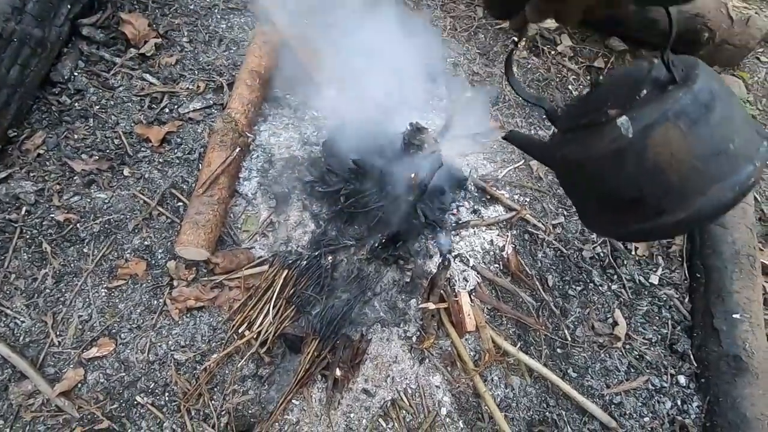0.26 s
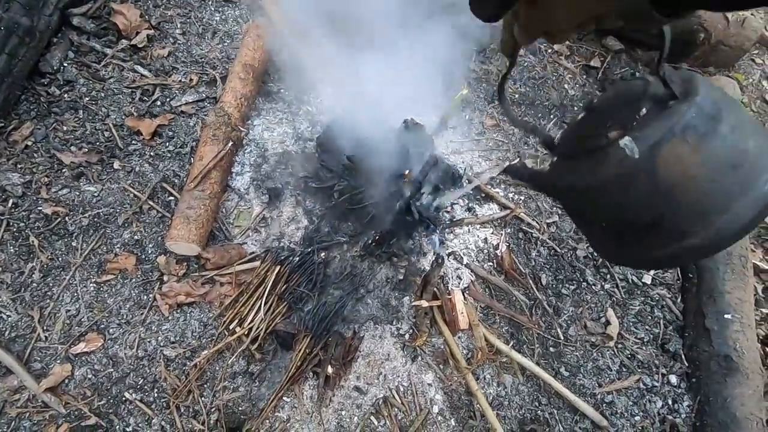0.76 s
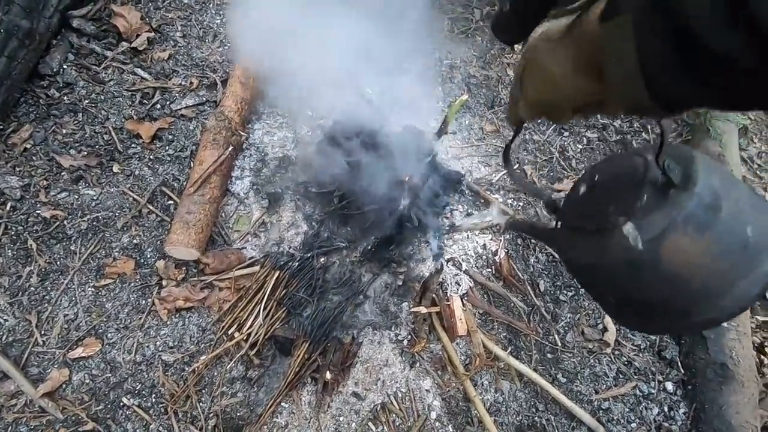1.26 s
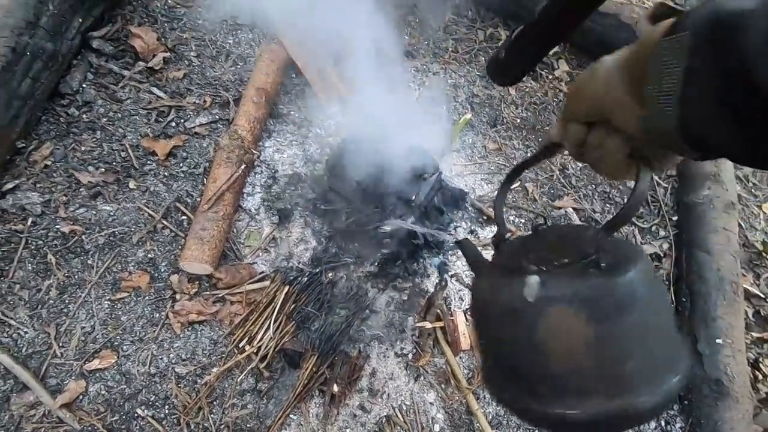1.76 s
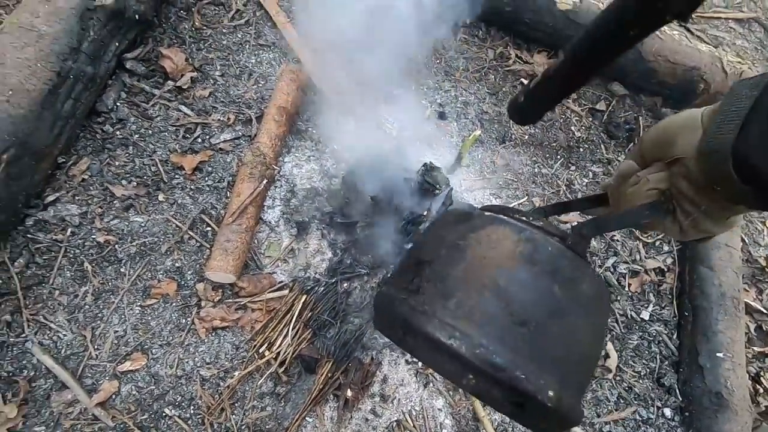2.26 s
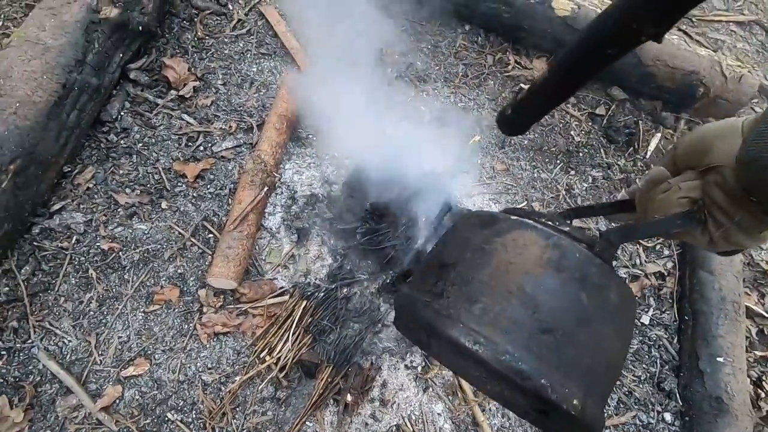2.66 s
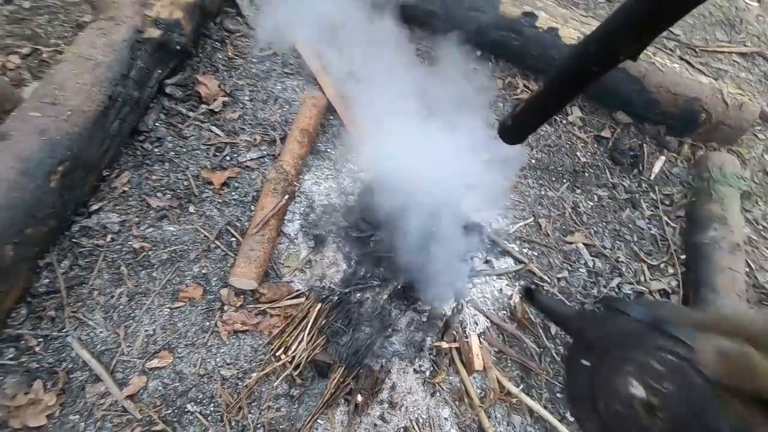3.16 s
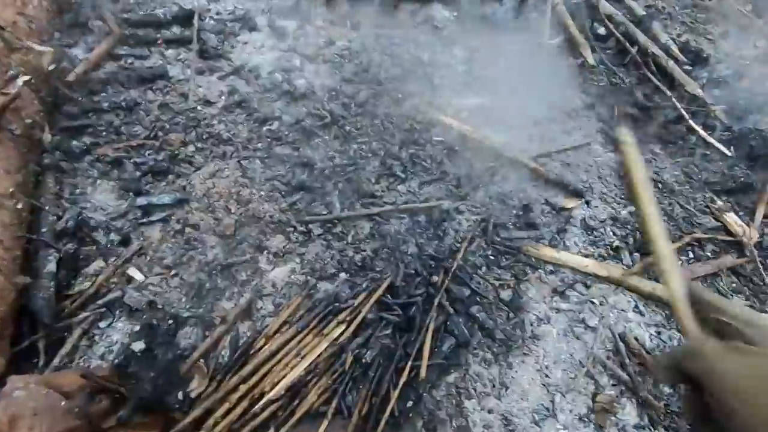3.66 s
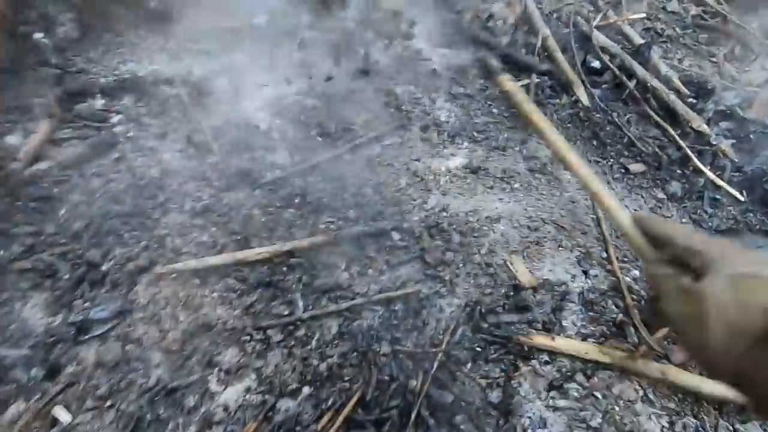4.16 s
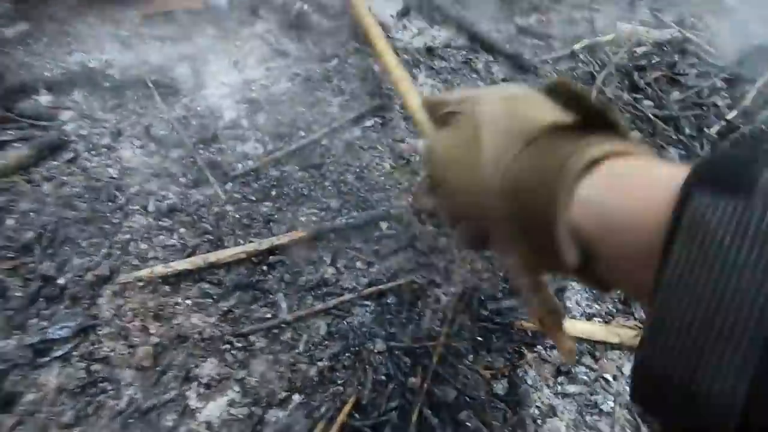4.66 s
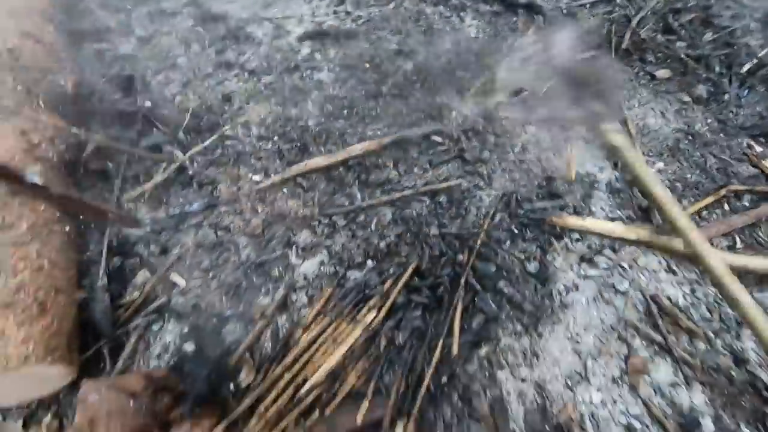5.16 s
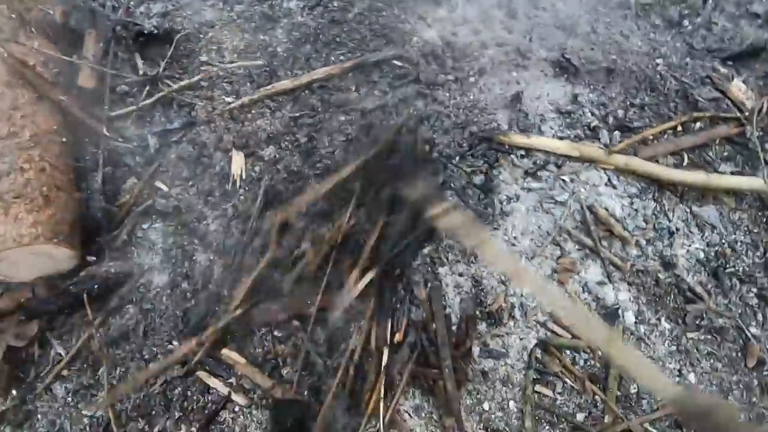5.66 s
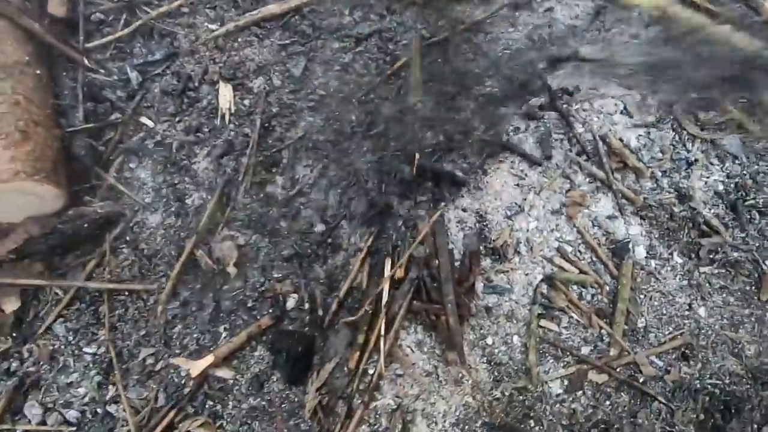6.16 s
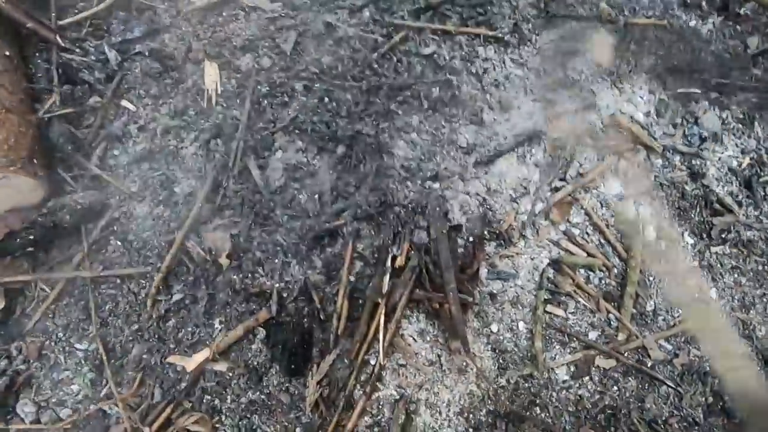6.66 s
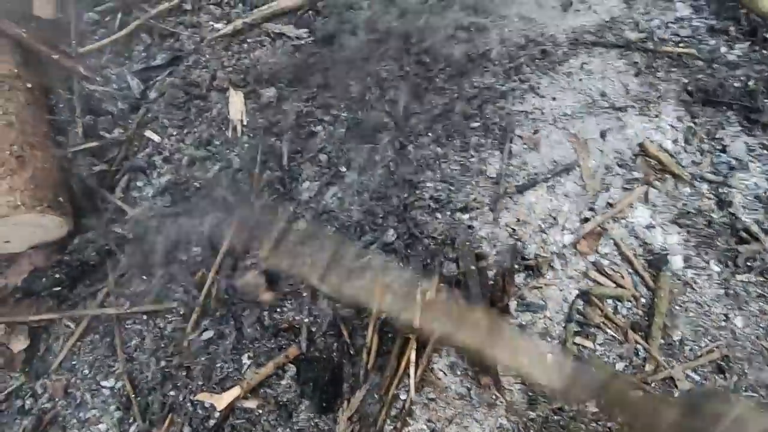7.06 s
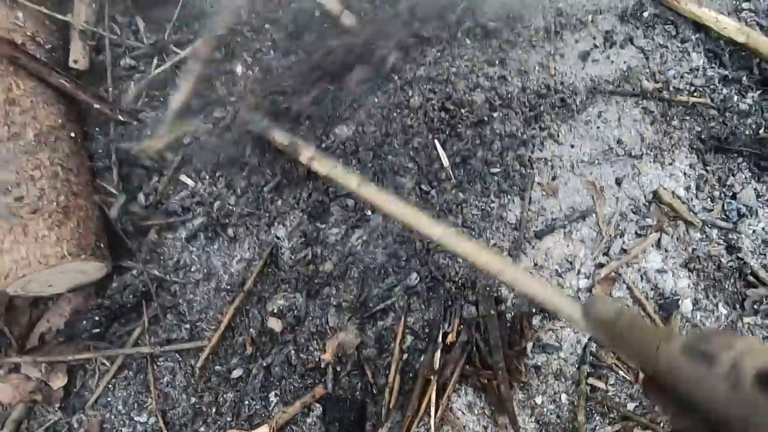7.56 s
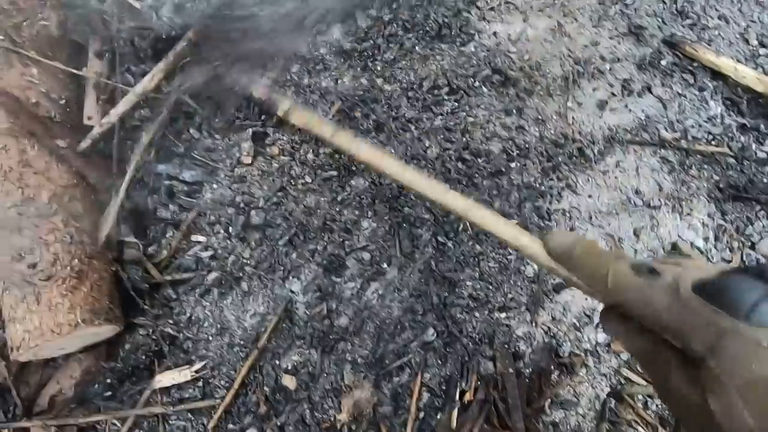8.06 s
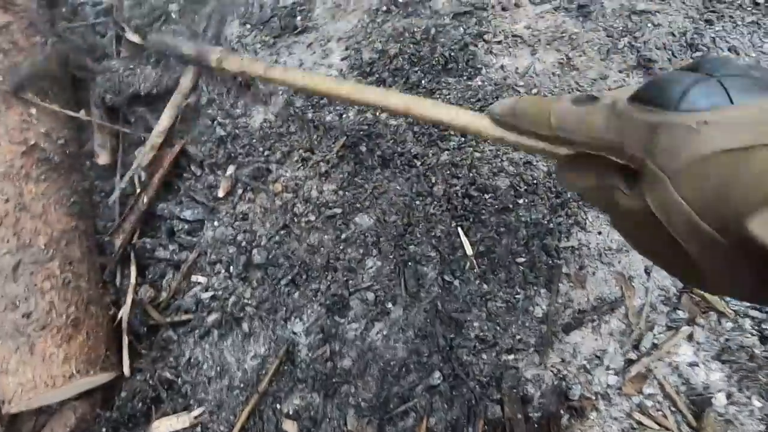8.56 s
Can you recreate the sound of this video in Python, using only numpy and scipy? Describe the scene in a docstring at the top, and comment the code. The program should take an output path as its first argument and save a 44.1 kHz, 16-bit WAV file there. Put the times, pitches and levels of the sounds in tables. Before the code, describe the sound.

Quiet steam hiss with small pops and soft kettle clinks over embers, then a stick rakes crunchy wet ash with sharp, loud cracks.

```python
"""Water from a kettle lands on hot embers: filtered noise hisses as steam and short bursts pop.
Meanwhile rising sine bubbles gurgle in the kettle and decaying metal modes clank.
Then a stick rakes the wet ash: clouds of short grains crunch, damped sines thump, and cracks ring the stick.
All of it is straight ahead of a body-worn microphone, which every movement rocks with
slow noise below hearing, over the lumpy rumble of a light wind and cloth."""
import sys
import numpy as np
from scipy import signal
from scipy.fft import rfft, irfft
from scipy.io import wavfile
from scipy.ndimage import uniform_filter1d

SR = 44100
rng = np.random.default_rng(int(sys.argv[2]) if len(sys.argv) > 2 else 0)


def store_pcm(level_fs):
    """Save levels as 16-bit WAV."""
    pcm = np.round(np.clip(level_fs, -1, 1) * 32767).astype(np.int16)
    wavfile.write(sys.argv[1], SR, np.atleast_2d(pcm).T)


N = 388080

# strokes of the stick through the ash: start_s (full pressure reached), held_s, level_db,
# depth_db (extra crunch and digging from deeper in the ash)
STICK_STROKES = [(3.53, 0.011, -48, -1), (3.7, .06, -50, -8), (3.79, 0.26, -43.5, 2.5),
                 (4.12, 0.014, -34, 0.5), (4.17, 0.22, -42, 4), (4.54, 0.084, -40.5, 3),
                 (4.67, 0.042, -30, 2), (4.78, 0.073, -40, -1), (4.88, 0.15, -38, -0.5),
                 (5.13, 0.026, -35, 6), (5.19, 0.079, -44, 4.5), (5.395, 0.069, -34.5, 2.5),
                 (5.5, 0.088, -31.5, -4), (5.545, 0.026, -26, -7), (5.62, 0.13, -36.5, -0.5),
                 (5.77, 0.028, -41.5, 7), (5.94, 0.038, -39.5, 3), (6.12, .11, -35.5, -1),
                 (6.3, 0.072, -41.5, 4.5), (6.37, 0.067, -37, 0.5), (6.525, 0.024, -34, -0.5),
                 (6.58, 0.21, -41, -1.5), (6.87, 0.046, -38, 2), (6.98, 0.078, -38.5, 2),
                 (7.12, 0.041, -38.5, -0.5), (7.21, 0.011, -39, 11.5), (7.275, 0.0096, -31, 2.5),
                 (7.38, 0.02, -33, 0.5), (7.53, 0.029, -37.5, 3), (7.635, 0.079, -40.5, 0),
                 (7.78, .15, -41, -2), (8.04, .14, -38.5, 2), (8.2, 0.18, -43, 0), (8.35, 0.02, -37, 4),
                 (8.425, 0.018, -34, 0), (8.52, 0.11, -40, 1.5), (8.66, 0.059, -39, 4),
                 (8.77, 0.0093, -35.5, 0)]
FIRST_STROKE_S, SECOND_STROKE_S = STICK_STROKES[0][0], STICK_STROKES[1][0]


def raking():
    """Grit slips in clumps under the stick; lumps of ash crunch below it."""
    # colour of the sliding grit: pitch_hz, gain_db
    grit_colour = [(100, -2.5), (250, 5.5), (500, 1.5), (1200, 0.5), (3200, 5), (5400, 2.5), (8600, 4),
                   (10600, -6.5), (13600, -2), (16000, -12)]
    charcoal_db, charcoal_per_s = -7.5, 220  # hard bits that ring briefly, level against the grit
    crunch_db, digging_db = -14.5, -28.5  # at 0 dB stroke level and 0 dB depth
    follow = 0.8  # dB of crunch and digging per dB of stroke: hard strokes are brighter

    level_db, depth_db = pressure()
    clumps = gain_of(2.7 * drift(0.0055))
    slide = rng.standard_normal(N) * 0.69
    slide += grains(3500 * clumps, 3.55, 510, 13600, cycles=1.04)
    grit = patchy(coloured(slide * clumps, grit_colour), 2, 1800, .025)
    low = band(grit, 36, 1920)
    bright = evened(grit - low)
    tumble = evened(low * gain_of(2.5 * drift(.01)))  # lumps of ash roll on their own
    # the tip digs into lumps
    digging = evened(band(grains(70, 3.5, 70, 420, cycles=1.1), 50, 500))
    bits = grains(charcoal_per_s * clumps, 3.5, 1200, 6000, cycles=5.5)

    surface = gain_of(level_db) * (bright + gain_of(charcoal_db) * bits)
    deep_db = follow * level_db + depth_db
    return surface + gain_of(crunch_db + deep_db) * tumble + gain_of(digging_db + deep_db) * digging


def pressure():
    """Level of the stick in the ash (all strokes over the trickle between them) and its depth, both in dB."""
    press_db_per_s, lift_db_per_s = 597, 446  # each stroke rises, holds and falls
    settling_db = -51.5  # ash trickles in between
    t = np.arange(N) / SR
    power = gain_of(settling_db) ** 2 * (t > SECOND_STROKE_S) + 1e-9
    depth = 0
    for s, held, db, depth_db in STICK_STROKES:
        off_db = np.maximum(press_db_per_s * (s - t), lift_db_per_s * (t - s - held))
        stroke = gain_of(db - np.clip(off_db, 0, 100)) ** 2
        power = power + stroke
        depth = depth + stroke * depth_db
    return 10 * np.log10(power), depth / power


def cracks():
    """Each crack also rings the stick at a new spot, and a few crumbs scatter after it."""
    # single coals and twigs cracking against the stick: start_s, peak_db, pitch_hz (centre)
    single_cracks = [(3.6, -26.5, 2410), (3.659, -30, 3820), (3.796, -24.5, 2410), (3.915, -21.5, 8050),
                     (4.013, -22, 3750), (4.188, -6.5, 4150), (4.216, -16, 787), (4.376, -18, 4970),
                     (4.483, -20.5, 4800), (4.505, -22.5, 3990), (4.594, -30, 3950), (4.684, -29, 2720),
                     (4.71, -13, 1590), (4.799, -14, 5500), (4.84, -24, 2620), (5.072, -30, 1940),
                     (5.397, -15.5, 2430), (5.421, -18.5, 2400), (5.558, -12.5, 8400), (5.664, -15, 4430),
                     (5.765, -14.5, 1460), (5.946, -14, 5800), (5.984, -14, 2340), (6.166, -21.5, 3000),
                     (6.18, -24, 8200), (6.223, -22.5, 690), (6.302, -20.5, 6160), (6.337, -14.5, 3680),
                     (6.454, -17.5, 6140), (6.509, -16.5, 4150), (6.525, -6, 3770), (6.629, -25.5, 5220),
                     (6.671, -29.5, 1700), (6.695, -15, 2380), (6.931, -21, 3680), (7.007, -22, 4450),
                     (7.087, -15.5, 866), (7.206, -13, 1740), (7.2568, -23, 2380), (7.278, -12.5, 3700),
                     (7.327, -18.5, 1920), (7.413, -11, 6900), (7.479, -25, 3600), (7.537, -19.5, 8400),
                     (7.5647, -22, 1800), (7.778, -22.5, 8200), (7.8244, -25, 2530), (7.96, -9.5, 2480),
                     (8.039, -21, 5400), (8.099, -12, 4970), (8.135, -25, 1900), (8.214, -20.5, 4320),
                     (8.302, -16, 7000), (8.318, -14, 8700), (8.351, -19.5, 2330), (8.416, -20, 3900),
                     (8.433, -15.5, 4850), (8.452, -16.5, 1690), (8.517, -17.5, 2870), (8.546, -12.5, 4900),
                     (8.564, -15, 4900), (8.587, -16.5, 3180), (8.602, -17, 1980), (8.676, -14, 1780),
                     (8.704, -10, 1760), (8.761, -24, 1750), (8.784, -16, 4750)]
    # modes of the stick: pitch_hz, level_db, t60_s
    stick_modes = [(720, 31, 0.0019), (1824, 12.5, 0.027), (2375, 15, 0.022), (3100, 18, 0.0055),
                   (4124, 13, 0.022), (4970, 17.5, 0.0041), (5760, 17.5, 0.0033)]
    grip_shift = .05  # typical share by which grip and pressure retune the stick from blow to blow

    out, t = np.zeros(N), np.arange(3000) / SR
    every = single_cracks + small_cracks()
    for (s, db, hz), noise in zip(every, rng.standard_normal((len(every), 3, len(t)))):
        t60 = .005 + 8 / hz  # larger pieces sound lower and longer
        spot_db = near(stick_modes, hz, 4) + 4.0 * noise[2, :len(stick_modes)]
        stick = ring(stick_modes, t * (1 + grip_shift * noise[2, -1]), spot_db)
        blow = peak_at(0, snap(hz, t60, noise[0])) + 0.058 * stick
        blow = band(blow, hz * .5, 10000)  # small pieces radiate no bass
        scatter_db = 8.5 * uniform_filter1d(noise[2], 40) * np.sqrt(40)
        crumbs = band(noise[1] * gain_of(-60 * t / 0.22 + scatter_db), hz * .5, 7500)
        push = np.sin(2 * np.pi * 420 * t) * gain_of(-60 * t / 0.008)  # the ash bed gives under low blows
        push_db = db - 11 - 9 * np.log2(hz / 1000)
        add(out, s, peak_at(db, blow) + peak_at(db - 30, crumbs) + peak_at(push_db, push))
    return out


def small_cracks():
    """Lesser cracks at random moments of the raking, as loud as the stroke allows."""
    count, pitch_hz = 50, (1000, 8500)
    over_stroke_db, top_db = (10, 14), -28  # range of peaks over the stroke level, and their ceiling
    s, size, pitch = rng.random((count, 3)).T
    s = np.interp(s, [0, 1], [SECOND_STROKE_S, N / SR])
    stroke_db = np.interp(s * SR, np.arange(N), pressure()[0])
    db = stroke_db + np.interp(size, [0, 1], over_stroke_db)
    return list(zip(s, np.minimum(db, top_db), spread(pitch, *pitch_hz)))


def snap(hz, t60, noise):
    """A sharp crack: a few cycles at the pitch of the breaking piece and its overtone, in a brighter noise burst."""
    t = np.arange(len(noise)) / SR
    decay = gain_of(-60 * t / t60) * (1 - np.exp(-t * hz * 2.5))
    burst = peak_at(0, band(noise * decay, hz * 0.12, 21800))
    tone = np.sin(2 * np.pi * hz * t) + 0.39 * np.sin(2 * np.pi * 1.72 * hz * t)
    return decay * tone + 1.16 * burst


def thumps():
    """The tip of the stick pushes softly into the ground: a low sine that dies within a few cycles."""
    # thumps of the tip: start_s, peak_db, pitch_hz
    tip_thumps = [(4.706, -42, 350), (5.126, -36, 199), (5.15, -53, 160), (7.046, -39, 260),
                  (7.284, -43, 190), (7.398, -38, 177), (7.786, -42, 290), (7.836, -33.5, 247),
                  (8.703, -23, 555)]
    cycles = 7.5  # until a thump has fallen by 60 dB
    out, t = np.zeros(N), np.arange(4000) / SR
    for s, db, hz in tip_thumps:
        envelope = gain_of(-60 * t * hz / cycles) * (1 - np.exp(-3 * hz * t))
        add(out, s, peak_at(db, np.sin(2 * np.pi * hz * t) * envelope))
    return out


def kettle():
    """Bubbles rise in pitch as they die; knocks ring the thin metal, and the harder ones also thud."""
    # bubbles in the pouring water: start_s, peak_db, pitch_hz (at the start)
    gurgles = [(0.421, -49, 940), (0.542, -47, 670), (0.563, -47, 920), (0.863, -46, 850),
               (0.988, -42, 740), (1.019, -44, 560), (1.097, -44, 590), (1.214, -43.5, 626),
               (1.26, -53, 620), (1.568, -44.5, 604)]
    # lid and handle knocking the kettle: start_s, peak_db, pitch_hz (of the modes struck most)
    clanks = [(0.42, -40.5, 3110), (0.545, -43, 1750), (0.623, -33.5, 3100), (0.645, -23, 1905),
              (0.719, -43, 2450), (0.778, -36, 1750), (0.862, -38, 3110), (0.872, -40, 1750),
              (0.9256, -43, 4000), (0.9896, -26.5, 3160), (1.0162, -36, 1740), (1.0984, -34.5, 1700),
              (1.21, -38, 1760), (2.966, -24, 2950), (2.9762, -26.5, 1500), (2.98, -35, 660)]
    # modes of the metal: pitch_hz, level_db, t60_s
    metal_modes = [(690, 25, 0.038), (964, 2, .11), (1490, -6, 0.066), (1750, -8.5, 0.094),
                   (2510, -4, 0.14), (2990, 14.5, 0.011), (3190, -0.5, 0.17), (3330, 3, 0.05),
                   (3900, 1, 0.2), (4970, -1, 0.082), (5460, 16, 0.056)]
    emptying_db_per_s = 7.5  # the emptier the kettle, the more it thuds

    out, t = np.zeros(N), np.arange(9000) / SR
    for s, db, hz in gurgles:
        turns = hz * (t + 3.7 * t ** 2)
        envelope = gain_of(-60 * t / 0.048) * (1 - np.exp(-t / 0.0009))
        add(out, s, peak_at(db, np.sin(2 * np.pi * turns) * envelope))
    for (s, db, hz), noise in zip(clanks, rng.standard_normal((len(clanks), len(t)))):
        rattle = band(noise * gain_of(-60 * t / .06), 400, 4000)
        tone = ring(metal_modes, t, near(metal_modes, hz, 28))
        metal = peak_at(0, tone) + peak_at(.4 * db + 7, rattle)  # light touches ring purer
        thud = np.sin(2 * np.pi * 280 * t) * gain_of(-60 * t / 0.013) * (1 - np.exp(-t / 0.0028))
        thud_db = 2.71 * db + 11 + emptying_db_per_s * s
        add(out, s, peak_at(db, metal) + peak_at(thud_db, thud))
    return out


def embers():
    """Pockets of steam burst out of the coals."""
    # single pops of steam, loud and faint: start_s, peak_db, pitch_hz (centre)
    single_pops = [(0.123, -33.5, 8250), (0.771, -26, 3180), (0.978, -29.5, 3120), (1.045, -28, 8100),
                   (1.231, -31, 8000), (1.2926, -28, 2200), (1.462, -29, 7850), (1.747, -25, 8040),
                   (1.9539, -24, 7650), (2.088, -30, 4900), (2.179, -29.5, 7300), (2.356, -29.5, 8610),
                   (2.557, -35, 13000), (2.6526, -32, 7800), (2.929, -32.5, 4880), (3.2634, -33.5, 8420),
                   (3.3928, -38, 12000), (3.4127, -43, 5130)]
    out, pops = np.zeros(N), single_pops + small_pops()
    for (s, db, hz), noise in zip(pops, rng.standard_normal((len(pops), 800))):
        add(out, s, peak_at(db, snap(hz, .005, noise)))
    return out


def small_pops():
    """Faint pops at random moments before the raking."""
    count, peak_db, pitch_hz = 22, (-45, -38), (2300, 13000)
    s, size, pitch = rng.random((count, 3)).T
    return list(zip(s * FIRST_STROKE_S, np.interp(size, [0, 1], peak_db), spread(pitch, *pitch_hz)))


def steam():
    """Fine fizz and tiny spits over a hiss that flutters in patches."""
    # steam from the embers: start_s, level_db
    steam_level = [(0, -53.5), (.4, -52), (1.07, -49), (1.7, -52.5), (2.5, -57), (3.5, -56.5), (8.8, -64)]
    # colour of the hiss: pitch_hz, gain_db
    hiss_colour = [(71, 12.5), (120, -19.5), (289, -2), (569, -1.5), (1010, -2.5), (1580, -4.5),
                   (3200, -3.5), (4660, -7), (5670, -4), (6630, -10), (8100, -1.5), (8900, -5.5),
                   (10400, -18.5), (12300, -9.5), (13800, -11.5), (16000, -20)]
    fizz = rng.standard_normal(N) * gain_of(.8 * drift(.02))
    spits = .5 * grains(400, 4.5, 3000, 14000, cycles=.8)
    hiss = patchy(coloured(fizz + spits, hiss_colour), 1.64, 1200, 0.032)
    return gain_of(curves(steam_level)[0]) * hiss


def sway():
    """Slow pressure swings at the microphone, and the lumpy rumble of wind and cloth."""
    # body movement and wind: start_s, swing_db (before the evening out below), rumble_db
    movement = [(0.0, -46.5, -66.5), (0.38, -32, -65.5), (1.66, -31, -62), (1.84, -49.5, -69),
                (2.42, -35, -66), (3.34, -38, -60), (4.15, -24.5, -56), (4.54, -37.5, -64), (5.1, -22, -53),
                (5.98, -28, -55), (6.25, -31.5, -62), (7.5, -27, -49), (8.2, -30.5, -59), (8.8, -31, -66)]
    # colour of the rocking: pitch_hz, gain_db
    rocking_colour = [(2, -9), (5, 3), (9, 1.5), (14, -7), (19, -29), (25, -14.5), (31, -51), (40, -26),
                      (60, -67.5)]
    swing_db, rumble_db = curves(movement)
    gain = gain_of(read(rocking_colour, np.fft.rfftfreq(N, 1 / SR)))
    swing = evened(irfft(rfft(rng.standard_normal(N)) * gain, N))
    # evened out, so that the movement sets the size of the swings
    lumps = np.sqrt(uniform_filter1d(swing ** 2, round(.35 * SR)) + 0.16)
    rumble = band(rng.standard_normal(N) * gain_of(3 * drift(.03)), 45, 150)
    return gain_of(swing_db) * swing / lumps + gain_of(rumble_db) * evened(rumble)


def grains(per_s, spread_db, lo_hz, hi_hz, cycles, count=16):
    """Short damped wavelets of many pitches, each set off by its own sparse clicks; a few are large."""
    size_db = spread_db * np.minimum(rng.exponential(1, N), 4)
    clicks = gain_of(size_db) * (rng.random(N) < per_s / SR)
    kind, out = rng.integers(0, count, N), np.zeros(N)
    t = np.arange(600) / SR
    for k, hz in enumerate(np.geomspace(lo_hz, hi_hz, count)):
        wavelet = np.cos(2 * np.pi * hz * t) * np.exp(-t * hz / cycles)
        wavelet = wavelet * np.sqrt(hz) / np.linalg.norm(wavelet)
        out += signal.oaconvolve(clicks * (kind == k), wavelet)[:N]
    return evened(out)


def ring(modes, t, weights_db):
    """Decaying modes after one blow."""
    return sum(gain_of(db + weight_db - 60 * t / t60) * np.sin(2 * np.pi * hz * t)
               for (hz, db, t60), weight_db in zip(modes, weights_db))


def near(modes, hz, db_per_octave):
    """A blow excites most the modes that lie near hz."""
    return [-db_per_octave * abs(np.log2(f / hz)) for f, _, _ in modes]


def patchy(x, depth_db, width_hz, length_s):
    """Colours a noise in random patches, each over its own band and moment."""
    z = signal.stft(x, nperseg=256)[2]
    bins, frames = max(round(width_hz * 256 / SR), 1), max(round(length_s * SR / 128), 1)
    field = rng.standard_normal(z.T.shape).T
    for axis, size in enumerate((bins, frames)):
        field = uniform_filter1d(uniform_filter1d(field, size, axis), size, axis)
    return evened(signal.istft(z * gain_of(depth_db * evened(field)), nperseg=256)[1][:N])


def coloured(x, spectrum):
    """Causal filter with the given spectrum: the phase is the Hilbert transform of the log gain."""
    gain_db = np.maximum(read(spectrum, abs(np.fft.fftfreq(8192, 1 / SR))), -100)
    log_gain = np.log(gain_of(gain_db))
    taps = np.fft.ifft(np.exp(np.conj(signal.hilbert(log_gain)))).real[:4096]
    return evened(signal.oaconvolve(x, taps)[:N])


def band(x, lo_hz, hi_hz):
    """Band-pass, with its edges kept between 20 Hz and 0.45 of the sample rate."""
    edges = np.clip([lo_hz, hi_hz], 20, .45 * SR)
    return signal.sosfilt(signal.butter(2, edges, "band", fs=SR, output="sos"), x)


def drift(seconds):
    """Slow chance of rms 1."""
    size = max(round(seconds * SR), 1)
    return evened(uniform_filter1d(uniform_filter1d(rng.standard_normal(N), size), size))


def spread(share, lo, hi):
    """A value between lo and hi on a log scale."""
    return lo * (hi / lo) ** share


def read(points, hz):
    """A spectrum's value at hz, straight on a log axis."""
    f, value = np.transpose(points)
    return np.interp(np.log(hz + 1), np.log(f + 1), value)


def curves(rows):
    """Each column of a table after its times, as one value per sample."""
    s, *columns = np.transpose(rows)
    return [np.interp(np.arange(N) / SR, s, c) for c in columns]


def gain_of(db):
    """dB to amplitude."""
    return 10 ** (np.asarray(db) / 20)


def evened(x):
    """Scales to rms 1."""
    return x / np.sqrt(np.mean(x ** 2) + 1e-20)


def peak_at(db, x):
    """Scales to a peak level."""
    return gain_of(db) * x / abs(x).max()


def add(mix, s, sound):
    """Mixes a sound in at s seconds."""
    part = mix[round(s * SR):][:len(sound)]
    part += sound[:len(part)]


def scene():
    """All sources straight ahead."""
    mid = raking() + cracks() + thumps() + kettle() + embers() + steam() + sway()
    return np.array([mid, mid])


def record(dry):
    """The two channels differ only by a faint flicker that follows the sound; then the band limit."""
    # left-right difference against the sum: pitch_hz, level_db (before the random factors)
    difference = [(25, -62), (70, -52), (240, -27), (950, -30), (3770, -30), (15000, -24)]
    flicker_db, edge_hz = 7, 15900  # how far the difference comes and goes; upper band limit
    hz, _, z = signal.stft(dry[0], SR, nperseg=1024)
    a, b = rng.standard_normal((z.shape[1], z.shape[0], 2)).T
    apart = gain_of(read(difference, hz)) * (hz > 20)
    comes = evened(gain_of(flicker_db * np.resize(drift(.03)[::512], z.shape[1])))
    flicker = signal.istft(z * (a + 1j * b) * apart[:, None] * comes, nperseg=1024)[1][:N]
    both = dry + np.outer([1, -1], flicker)
    low_pass = signal.firwin(401, edge_hz, window=("kaiser", 9), fs=SR)
    return signal.oaconvolve(both, low_pass[None], "same")


dry = scene()
out = record(dry)
store_pcm(out)
```